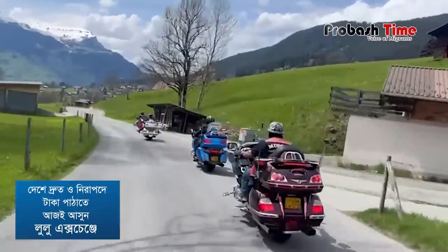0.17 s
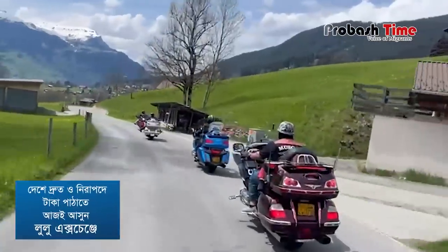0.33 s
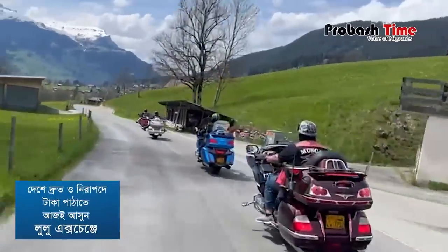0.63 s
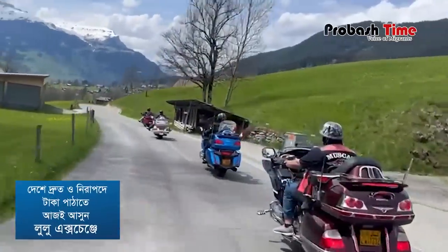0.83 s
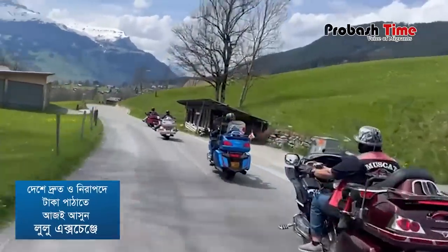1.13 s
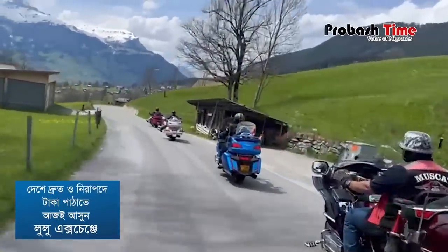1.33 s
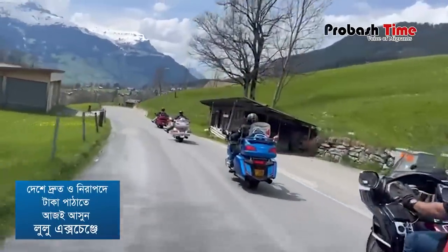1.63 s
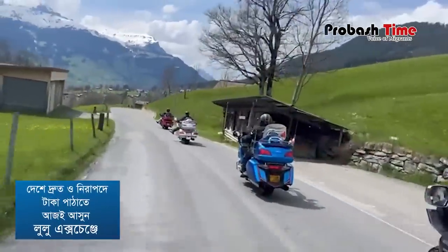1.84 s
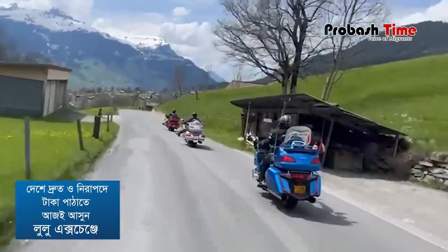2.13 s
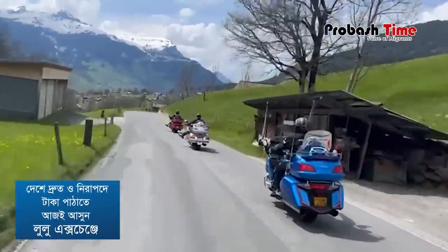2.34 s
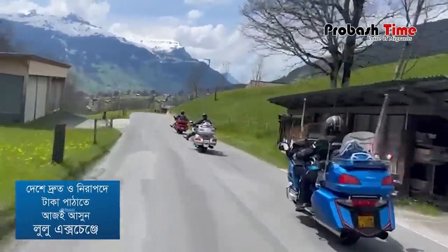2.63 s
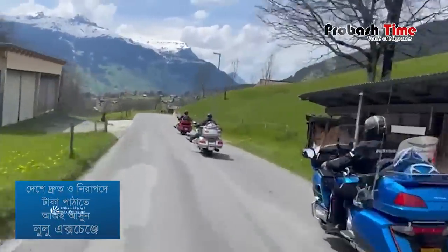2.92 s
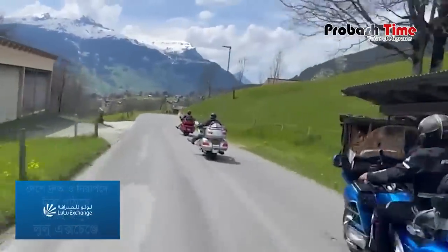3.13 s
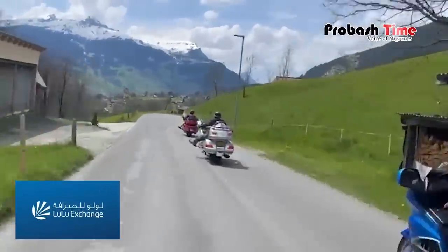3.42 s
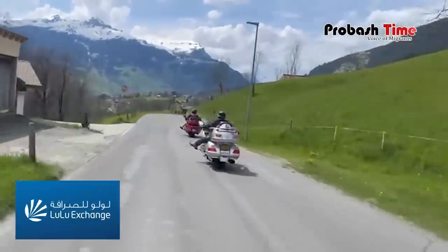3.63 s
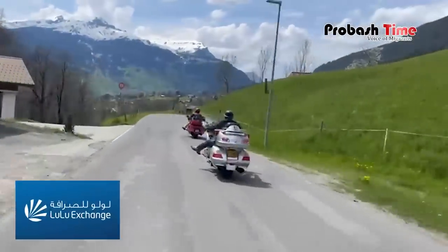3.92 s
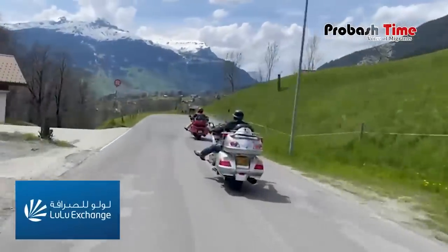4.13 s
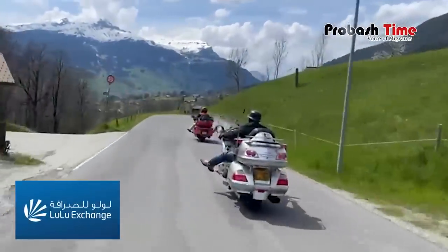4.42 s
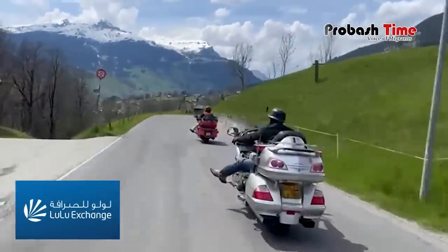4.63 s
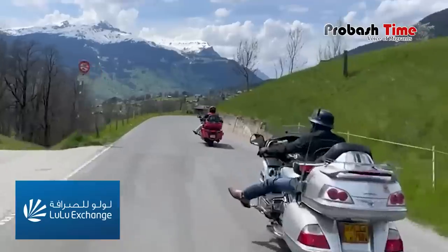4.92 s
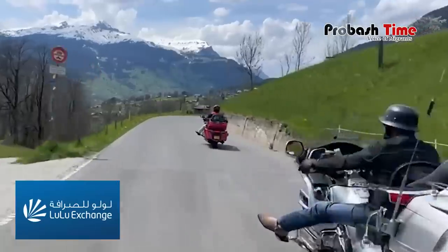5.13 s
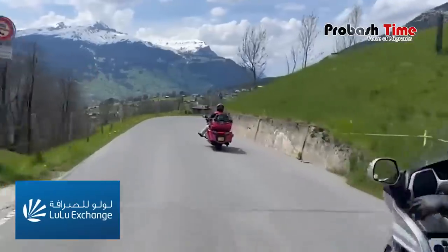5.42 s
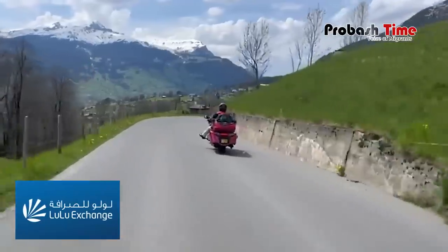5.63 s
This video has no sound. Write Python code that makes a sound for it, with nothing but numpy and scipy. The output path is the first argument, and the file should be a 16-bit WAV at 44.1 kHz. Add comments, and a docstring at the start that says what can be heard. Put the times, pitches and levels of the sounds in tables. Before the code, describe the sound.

A windy ride along an open road, heard from an exposed stereo microphone on a moving motorcycle. Throughout, deep uneven wind rumble, thuds and fluttering buffets lie over a steady grainy tyre roar and thin air hiss. A low, wavering exhaust drone throbs from the start, rising from about 1.4 s and booming strongest around 1.7 to 2.3 s as the first machine is overtaken; a neighbouring engine tone climbs slightly between 2 and 2.6 s. The drone then breaks up and fades away by 4 s. Around 3.0 to 3.4 s a short, rapid valve chatter pulses on the right as a second machine passes, with faint hums and whines. Blunt low slaps and strong gusts strike near 2.5, 3.2, 3.8 to 4.0 and 4.3 to 4.75 s, the loudest briefly distorting. From 5 s a faint whine and soft hiss mark another pass, ending in wind and road rush.

```python
"""Wind buffets two microphone ports over tyre and road roar as a rider overtakes three touring motorcycles.
Wind, roar and hiss are turbulent noise, shaped by spectrum tables and partly shared by the ports.
An exhaust drone booms as the first machine is passed: wandering sines at the firing rates.
Gears whine faintly on gliding sines, valve chatter is pulsed hiss, and brief swings slap the ports.
The loudest gusts overload the input, which bends their peaks over."""
import sys
import numpy as np
from scipy import signal
from scipy.io import wavfile
from scipy.ndimage import uniform_filter1d

SR = 44100
rng = np.random.default_rng(int(sys.argv[2]) if len(sys.argv) > 2 else 0)


def unload_wav(signal):
    """Save mono or channel-first audio to the path in sys.argv[1] as 16-bit WAV at rate SR, clipped to [-1, 1]."""
    wavfile.write(
        sys.argv[1],
        SR,
        np.round(np.clip(np.atleast_2d(signal).T, -1, 1) * 32767).astype(np.int16),
    )


N = 254456


def gain_of(db):
    """Decibel definition: an amplitude factor is ten to the power of dB over 20."""
    return 10 ** (np.asarray(db) / 20)


def evened(x):
    """Normalisation: scales a signal to unit rms."""
    return x / np.sqrt(np.mean(np.abs(x) ** 2) + 1e-20)


def read_spectrum(points, hz):
    """Logarithmic frequency scale: interpolates each table column at hz, as upright arrays."""
    f, *values = np.transpose(points)
    return [np.interp(np.log(hz + 1), np.log(f + 1), v)[:, None] for v in values]


def columns(rows):
    """Piecewise-linear envelopes: a fade, silent outside the span, then each column at every sample."""
    s, *values = np.transpose(rows)
    t = np.arange(N) / SR
    edge_s = 0.033
    fade = np.clip(np.minimum(t - s[0], s[-1] - t) / edge_s, 0, 1)
    return fade, *(np.interp(t, s, v) for v in values)


def wander(per_s):
    """Low-passed noise: a random drift of about unit rms, smooth above per_s."""
    step = 64  # samples between drawn points
    z = rng.standard_normal(N // step + 2)
    z = signal.sosfiltfilt(signal.butter(2, per_s, fs=SR / step, output="sos"), z)
    return np.interp(np.arange(N) / step, np.arange(len(z)), evened(z))


def tone(hz, level_db, waver, throb_db, per_s):
    """Frequency and amplitude modulation: a sine whose pitch and strength drift about the given rms level."""
    turns = np.cumsum(hz * (1 + waver * wander(per_s))) / SR
    strength = np.sqrt(2) * gain_of(level_db + throb_db * wander(per_s))
    return strength * np.sin(2 * np.pi * (turns + rng.random()))


# Correlation of noise at the port pair. Each row: frequency in Hz, likeness from 0 to 1,
# phase lead of the right port in rad, left over right in dB.
PORT_PAIR = [(40, .9, -.12, 2.1), (130, .93, -.1, 2), (260, .88, -.05, 1.2), (420, .35, -.4, 1),
             (580, .12, 2.7, .3), (880, .75, 2, -1.3), (1200, .77, 1.3, .3), (1650, .3, -.5, 3),
             (1900, .48, -1, 2.9), (2600, .15, .8, .8), (4100, .48, .2, -.2), (5200, .17, .6, -2.5),
             (6800, .42, .3, -4.5), (7400, .25, 1.4, -2.5), (8100, .85, 1.1, -.4), (8500, .99, .1, 0),
             (9600, .99, .1, 0)]
# Noise reaching the right port alone: rms burst depth in dB, burst smoothing in s, and the
# frequency in Hz around which the bursts die out.
STRAY_DB, STRAY_S, STRAY_TOP_HZ = 3, .08, 330


def rush(spectrum, level_db, size, patch_db, patch_hz, patch_s, flutter_db, flutter_per_s):
    """Partly coherent turbulence: random spectra in drifting patches, both ports fluttering together."""
    hop, hz = size // 4, np.fft.rfftfreq(size, 1 / SR)
    a, b, c, d, patches = rng.standard_normal((N // hop + 5, len(hz), 5)).T
    # Smooth the patches across frequency, then across time.
    patches = uniform_filter1d(patches, max(round(patch_hz / hz[1]), 1), 0)
    patches = evened(uniform_filter1d(patches, max(round(patch_s * SR / hop), 1), 1))

    same, lead, lean_db = read_spectrum(PORT_PAIR, hz)
    same = np.clip(same, 0, 1)
    left = a + 1j * b
    burst_frames = max(round(STRAY_S * SR / hop), 1)
    bursts = evened(uniform_filter1d(rng.standard_normal(a.shape[1]), burst_frames))
    burst_db = STRAY_DB * bursts / (1 + (hz[:, None] / STRAY_TOP_HZ) ** 4)
    stray = gain_of(burst_db) * (c + 1j * d)
    right = same * np.exp(1j * lead) * left + np.sqrt(1 - same ** 2) * stray

    z = np.array([left * gain_of(lean_db / 2), right * gain_of(-lean_db / 2)])
    z *= gain_of(read_spectrum(spectrum, hz)[0] + patch_db * patches)
    x = signal.istft(z, nperseg=size, noverlap=size - hop)[1][:, :N]
    x = x * gain_of(flutter_db * wander(flutter_per_s))
    mid_rms = np.sqrt(np.mean(x.mean(0) ** 2))
    return gain_of(level_db) * x / mid_rms


# Slow strength of the air on the ports, before gusts. Each row: time in seconds, rumble level in dB,
# thudding level in dB, buffeting level in dB.
WIND_LEVELS = [(0, -25.5, -17, -23.5), (.45, -23, -20.5, -22.5), (.8, -27, -18.5, -21),
               (1.1, -28.5, -15.5, -27.5), (1.6, -21.5, -23.5, -21), (1.75, -24.5, -16.5, -24),
               (2.15, -12.5, -13, -22), (2.7, -21, -21, -21), (3.2, -22, -25, -20),
               (3.45, -21, -26.5, -21.5), (3.7, -19.5, -28.5, -22.5), (4.03, -24.5, -20.5, -22),
               (4.6, -27, -26, -23.5), (4.85, -26.5, -21.5, -23.5), (5.1, -21, -19, -21),
               (5.42, -26, -23, -24.5), (5.77, -24, -17.5, -25)]
# Relative spectra of the three. Each row: frequency in Hz, density in dB per Hz.
RUMBLE_SPECTRUM = [(20, -50), (32, -15), (45, 9), (60, 10.5), (75, 4.5), (90, 9), (130, -59)]
THUD_SPECTRUM = [(55, -56), (75, -7), (95, -1), (115, -6.5), (130, -10.5), (150, -6), (180, -15.5),
                 (220, -60), (400, -90)]
BUFFET_SPECTRUM = [(110, -9), (180, 0.5), (447, -4), (562, -7.5), (687, -10.5), (900, -19), (1170, -55.5),
                   (1980, -120)]


def wind():
    """Turbulent pressure: lumpy rumble, thuds of large eddies, brighter buffeting of small ones, and slaps."""
    bass_lift, buffet_lift = gusts()
    _, rumble_db, thud_db, buffet_db = columns(WIND_LEVELS)
    rumble = rush(RUMBLE_SPECTRUM, rumble_db + bass_lift, size=4096, patch_db=0.2, patch_hz=30,
                  patch_s=.1, flutter_db=-2.0, flutter_per_s=39)
    thud = rush(THUD_SPECTRUM, thud_db + bass_lift, size=4096, patch_db=1.5, patch_hz=30,
                patch_s=.1, flutter_db=-1.5, flutter_per_s=9.9)
    buffet = rush(BUFFET_SPECTRUM, buffet_db + buffet_lift, size=1024, patch_db=0.5, patch_hz=149,
                  patch_s=0.07, flutter_db=1.97, flutter_per_s=22)
    return rumble + thud + buffet + slaps()


# Gusts that change the air noise for a moment. Each row: start in seconds, length in seconds,
# lift of the bass in dB, lift of the buffeting in dB (below zero it dips).
GUST_LIFTS = [(0.19, 0.17, 2.5, 3.5), (0.893, 0.11, -2, 8), (1.116, 0.26, 1, 8.5), (1.376, 0.22, 4, 1.5),
              (2.175, 0.22, -1, 5), (2.418, 0.13, -2, 6), (3.012, 0.063, 8, 0), (3.265, 0.16, 2, 2),
              (3.53, 0.1, 4.5, 2.5), (3.813, 0.18, 5.5, 5.5), (4.09, 0.14, 5, 6.5), (4.265, 0.24, 6, 5.5),
              (4.518, 0.1, 9, -2.5), (4.67, 0.092, 6.5, 5.5), (5.165, 0.13, 2.5, 2.5)]
GUST_EDGE_S = 0.05  # full rise or fall, centred on the start or end


def gusts():
    """Trapezoidal envelopes: the bass and buffeting lifts in dB, each gust rising, holding and falling."""
    t, lift_db = np.arange(N) / SR, np.zeros((2, N))
    for start, length, *peak_db in GUST_LIFTS:
        inside_s = np.minimum(t - start, start + length - t)
        shape = np.clip(inside_s / GUST_EDGE_S + .5, 0, 1)
        lift_db += np.outer(peak_db, shape)
    return lift_db


# Single eddies slapping the ports. Each row: centre in seconds, envelope peak in dB before a small
# lean to the left, pitch at the centre in Hz.
EDDY_SLAPS = [(2.184, -8, 610), (2.53, -3, 70), (3.171, -4.5, 59), (3.798, -1.5, 122), (3.846, -9, 74.6),
              (3.919, -2.5, 85), (3.971, -1, 95.5), (4.289, -8.5, 83), (4.46, -8, 86), (4.539, -4.5, 87),
              (4.713, -2, 83), (4.749, -6, 195)]
SLAP_CYCLES, SLAP_SAG = 0.72, 0.46  # half length in cycles; share of the pitch lost over that


def slaps():
    """Gaussian wave packets: each slap is a short bell-shaped swing that sags in pitch."""
    t, out = np.arange(N) / SR, np.zeros(N)
    for (s, db, hz), phase in zip(EDDY_SLAPS, rng.random((len(EDDY_SLAPS), 1))):
        cycles = np.clip((t - s) * hz, -9, 9)
        sagging = cycles - SLAP_SAG * cycles ** 2 / (2 * SLAP_CYCLES)
        swing = np.cos(2 * np.pi * (sagging + phase))
        bell = np.exp(-(cycles / SLAP_CYCLES) ** 2)
        out += gain_of(db) * bell * swing
    return out * gain_of([[1.1], [-1.1]])


# Tyre roar before gusts and treble tilt. Each row: time in seconds, level in dB.
ROAD_LEVELS = [(0, -34.5), (.21, -27.5), (.55, -28.5), (.95, -28), (1.53, -25), (1.9, -24.5), (2.31, -23),
               (2.85, -25.5), (3.3, -23.5), (3.57, -21.5), (3.95, -24), (4.42, -23), (4.56, -29.5),
               (4.74, -25.5), (4.9, -27), (5.24, -25.5), (5.38, -26), (5.77, -26)]
# Treble of the roar over time. Each row: time in seconds, treble change in dB.
ROAR_TREBLE = [(0, 0), (1.5, -2), (2.5, 0), (3.8, 2), (5, 2.5), (5.77, 2.7)]
# Relative spectra of roar and air hiss. Each row: frequency in Hz, density in dB per Hz.
ROAR_SPECTRUM = [(290, -14), (500, -0.5), (690, 0.5), (761, -0.5), (989, -3.5), (1400, -7.5), (2000, -16),
                 (2700, -27), (3000, -30), (3900, -41), (6600, -120)]
HISS_SPECTRUM = [(1350, -2), (2300, 1), (2720, -1), (4000, -2.5), (4690, -2), (5310, -4.5), (6580, -5),
                 (7440, -7), (8520, -7), (9350, -12), (9700, -16), (10000, -120)]
GUST_ROAR_SHARE = 0.17  # share of the buffeting lift, in dB, that the roar takes


def road():
    """Broadband rolling noise: tyre roar in short narrow strands, with a thin hiss above it."""
    roar_db = columns(ROAD_LEVELS)[1] + GUST_ROAR_SHARE * gusts()[1]
    roar = rush(ROAR_SPECTRUM, roar_db, size=2048, patch_db=2.5, patch_hz=70,
                patch_s=.05, flutter_db=1.1, flutter_per_s=22)
    low = signal.sosfiltfilt(signal.butter(2, 1150, fs=SR, output="sos"), roar)
    treble = roar - low
    roar = low + gain_of(columns(ROAR_TREBLE)[1]) * treble
    hiss = rush(HISS_SPECTRUM, passes(), size=1024, patch_db=3.5, patch_hz=149.9,
                patch_s=.04, flutter_db=0.7, flutter_per_s=15)
    return roar + hiss


# Machines and sheds going by. Each row: closest moment in seconds, added hiss at that moment in dB,
# half-power time before it in seconds, half-power time after it in seconds.
PASSING_OBJECTS = [(1.6, -38, 0.49, 0.98), (2.331, -36, 0.25, 0.3), (3.12, -35.5, 0.066, 0.41),
                   (3.55, -35.5, 0.11, 0.21), (5.499, -35.5, 0.17, 0.96)]
HISS_DB, HISS_GROWS_DB_PER_S = -44, .5  # the air hiss alone: level at the start, and growth


def passes():
    """Inverse-square law: hiss level in dB, adding the power of the air and of each pass."""
    t = np.arange(N) / SR
    power = gain_of(HISS_DB + HISS_GROWS_DB_PER_S * t) ** 2
    for s, db, approach, departure in PASSING_OBJECTS:
        distance = (t - s) / np.where(t < s, approach, departure)
        power = power + gain_of(db) ** 2 / (1 + distance ** 2)
    return 10 * np.log10(power)


# Nearest exhaust, before the port lean. Each row: time in seconds, firing tone in dB.
FIRING_LEVELS = [(0, -23), (.2, -19), (.38, -26), (.55, -20), (.8, -15), (1, -22), (1.18, -18), (1.28, -27),
                 (1.4, -16), (1.62, -18), (1.72, -9.5), (1.92, -10), (2.13, -7.5), (2.24, -15),
                 (2.33, -8.5), (2.43, -25), (2.54, -13), (2.68, -23), (2.9, -19), (3.2, -19), (3.4, -28),
                 (3.72, -26), (3.79, -13), (3.84, -27), (4, -30)]
# One cylinder bank, before the port lean. Each row: time in seconds, firing rate of the bank in Hz,
# its tone in dB, uneven-firing tone at one and a half times that rate in dB.
CYLINDER_BANK = [(0, 68.6, -29, -23), (.3, 66.8, -26, -28), (.7, 65.9, -26, -29), (1.3, 65.3, -23, -27),
                 (2.1, 64.7, -25, -28), (2.6, 64.1, -25, -30), (2.85, 63.9, -28, -20),
                 (3.1, 63.7, -26, -20), (3.35, 63.2, -22, -26), (4, 62.5, -33, -33)]
# Lower drone beside it, before the port lean. Each row: time in seconds, pitch in Hz, level in dB.
PASS_BOOM = [(1.68, 116, -21), (1.8, 109, -14), (1.92, 106, -12.5), (2.02, 98, -14), (2.16, 92, -24)]


def exhaust():
    """Harmonics of the firing rate: both banks, lumpy tones of uneven firing, and a lower drone at the pass."""
    fade, hz, bank_db, uneven_db = columns(CYLINDER_BANK)
    firing = tone(2 * hz, columns(FIRING_LEVELS)[1], waver=.014, throb_db=2.2, per_s=16)
    bank = tone(hz, bank_db, waver=.04, throb_db=4, per_s=10)
    uneven = tone(1.5 * hz, uneven_db, waver=.03, throb_db=4, per_s=10)
    near, boom_hz, boom_db = columns(PASS_BOOM)
    boom = near * tone(boom_hz, boom_db, waver=0.02, throb_db=2.5, per_s=14)
    drone = firing + bank + uneven + boom
    left, right = drone, np.roll(drone, shift=14)  # the right port hears it 14 samples later
    return fade * np.array([left, right]) * gain_of([[1.3], [-1.5]])


# Whines and hums that come and go, one list for each, before the lean to the right.
# Each row: time in seconds, pitch in Hz, level in dB.
PASSING_WHINES = [
    [(.35, 4850, -57), (.8, 4835, -53), (1.5, 4845, -51), (1.72, 4825, -48), (1.85, 4800, -55),
     (2.7, 4780, -58)],
    [(3.25, 4420, -54), (3.5, 4400, -53), (3.75, 4390, -56)],
    [(4.98, 4595, -55), (5.12, 4590, -50), (5.25, 4575, -49), (5.33, 4550, -56), (5.77, 4520, -56)],
    [(2.66, 684, -35), (2.85, 676, -34), (3.03, 674, -30), (3.17, 686, -34)],
    [(3.62, 735, -34), (3.7, 712, -32), (3.78, 725, -34)],
    [(5.15, 905, -28), (5.25, 888, -28), (5.34, 880, -30)],
    [(5.49, 1020, -37), (5.55, 995, -34), (5.6, 990, -38)],
]
# Rms pitch wander of each whine. One column: wander in Hz.
WHINE_WANDER = [38, 20, 9, 4, 12, 16, 12]
# An engine gaining speed. Each row: time in seconds, pitch in Hz, level in dB.
REVVING_ENGINE = [(1.4, 168, -32), (1.8, 172, -30), (2.2, 182, -22), (2.4, 197, -25), (2.55, 213, -25),
                  (2.7, 222, -36)]


def whines():
    """Tones of rotation: gears and tyres of machines passed on the right, and the engine that speeds up."""
    passing = np.zeros(N)
    for rows, waver_hz in zip(PASSING_WHINES, WHINE_WANDER):
        fade, hz, level_db = columns(rows)
        passing += fade * tone(hz, level_db, waver=waver_hz / hz, throb_db=3, per_s=30)
    fade, hz, level_db = columns(REVVING_ENGINE)
    revving = fade * tone(hz, level_db, waver=.004, throb_db=1.5, per_s=6)
    return passing * gain_of([[-4], [4]]) + revving


# Valve chatter of the second machine alongside, before the lean to the right.
# Each row: time in seconds, puffs per second, level in dB.
VALVE_CHATTER = [(3.03, 73, -46), (3.12, 95, -35), (3.22, 90.2, -39), (3.4, 46, -43.5)]
# Its relative spectrum. Each row: frequency in Hz, density in dB per Hz.
CHATTER_SPECTRUM = [(2000, -26), (2900, 2), (4300, -5), (5900, 5.5), (7500, -2), (9300, -1), (9700, -11),
                    (10000, -120)]
PUFF_SHARPNESS, CHATTER_LEAN_DB = 0.63, 2  # peaking of each puff; right raised and left lowered by this


def chatter():
    """Periodic amplitude modulation: hiss pulsing in puffs, stronger on the right."""
    fade, per_s, level_db = columns(VALVE_CHATTER)
    puffs = np.exp(PUFF_SHARPNESS * np.cos(2 * np.pi * np.cumsum(per_s) / SR))
    hiss = rush(CHATTER_SPECTRUM, level_db, size=512, patch_db=0.5, patch_hz=600,
                patch_s=.012, flutter_db=0.0, flutter_per_s=50)
    return fade * evened(puffs) * hiss * gain_of([[-CHATTER_LEAN_DB], [CHATTER_LEAN_DB]])


# Relative spectrum of the faint anti-phase noise between the channels.
# Each row: frequency in Hz, density in dB per Hz.
ANTIPHASE_SPECTRUM = [(9000, -40), (9300, -8), (9700, 0), (10500, 3), (11000, -1), (11300, -10),
                      (11600, -22), (11800, -60)]
ANTIPHASE_DB = -15.5  # offset from the level curve of passes(), which it follows


def antiphase_noise():
    """Anti-phase noise: a very faint, thin layer from 9 to 11.6 kHz, opposite in the two channels."""
    x = rush(ANTIPHASE_SPECTRUM, passes() + ANTIPHASE_DB, size=1024, patch_db=1, patch_hz=400,
             patch_s=.05, flutter_db=1, flutter_per_s=15)[0]
    return np.array([x, -x])


def scene():
    """Superposition: all layers add in the two channels."""
    return wind() + road() + exhaust() + whines() + chatter() + antiphase_noise()


KNEE = .98  # the input bends over above this share of full scale
EDGE_HZ = 11827  # upper band limit


def record(dry):
    """Filtering and saturation: the capsule loses deep rumble, the input bends peaks, then the band limit."""
    thinned = signal.sosfilt(signal.butter(2, 36, "highpass", fs=SR, output="sos"), dry)
    over = np.maximum(np.abs(thinned) - KNEE, 0)
    room = 1 - KNEE
    bent = thinned - np.sign(thinned) * (over - room * np.tanh(over / room))
    band_limit = signal.firwin(511, EDGE_HZ, window=("kaiser", 9), fs=SR)
    return signal.oaconvolve(bent, band_limit[None], "same")


dry = scene()
out = record(dry)
unload_wav(out)
```